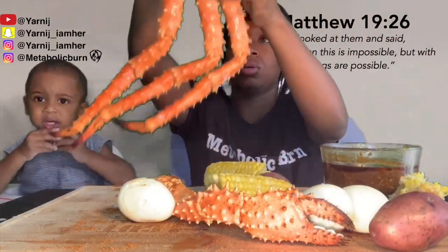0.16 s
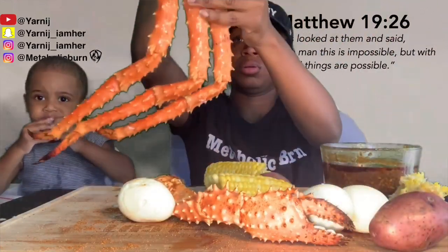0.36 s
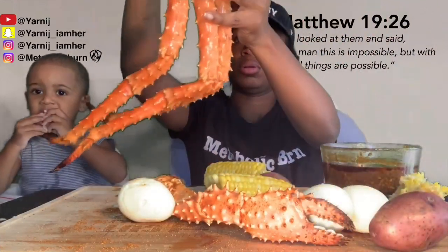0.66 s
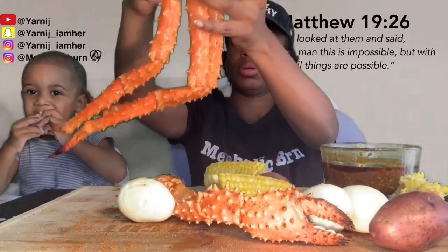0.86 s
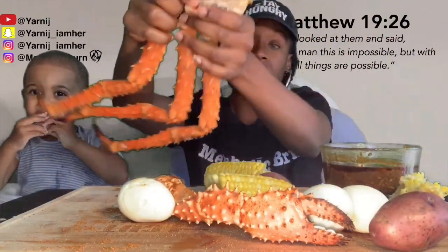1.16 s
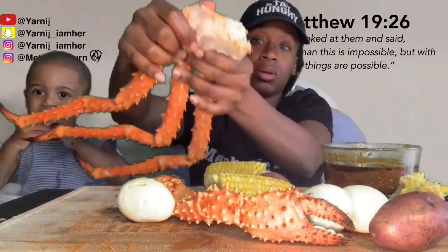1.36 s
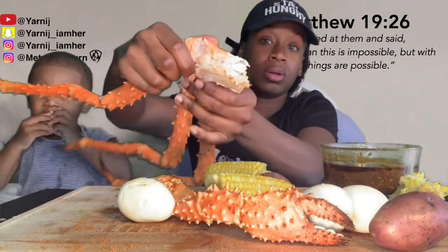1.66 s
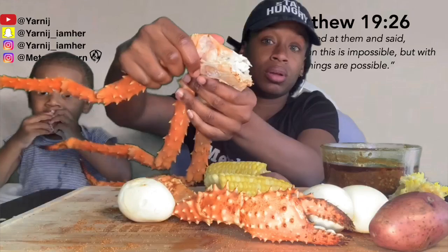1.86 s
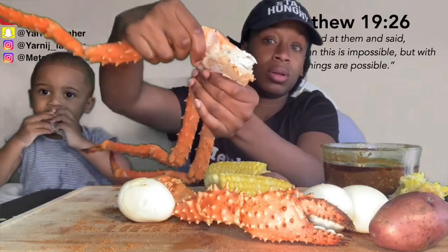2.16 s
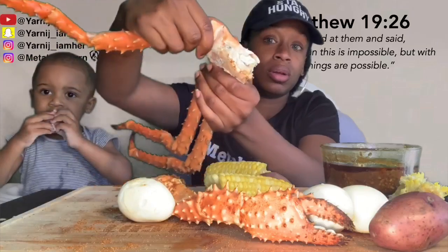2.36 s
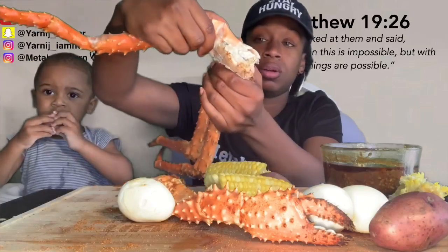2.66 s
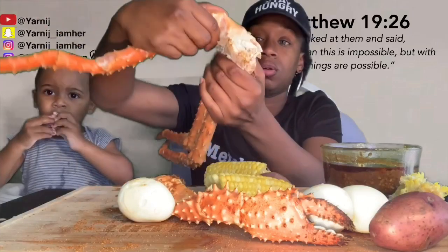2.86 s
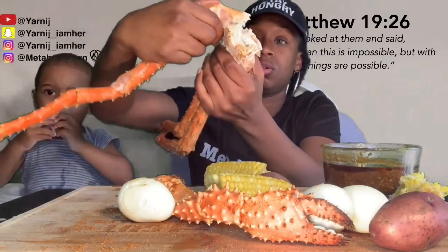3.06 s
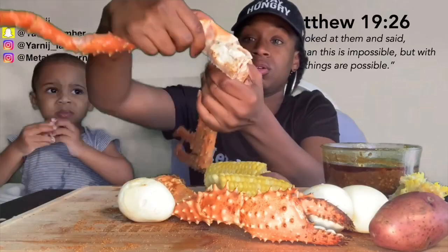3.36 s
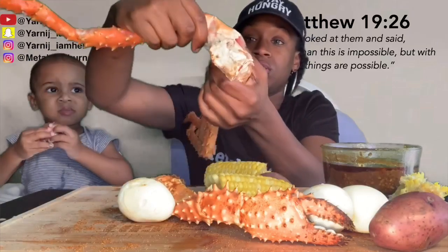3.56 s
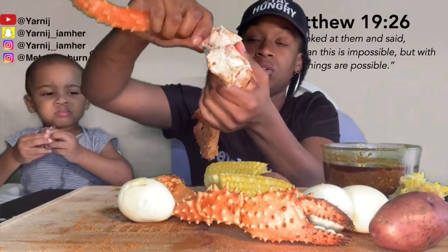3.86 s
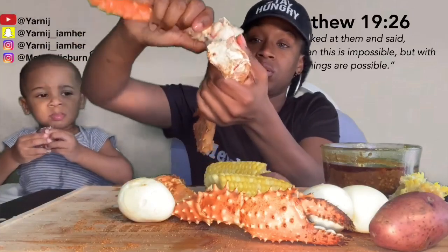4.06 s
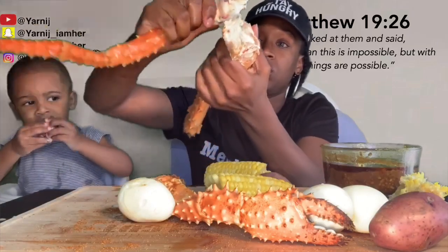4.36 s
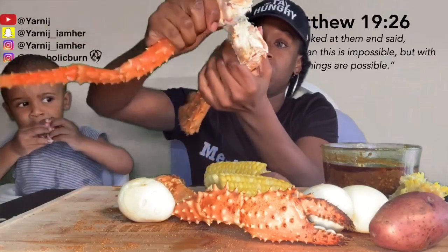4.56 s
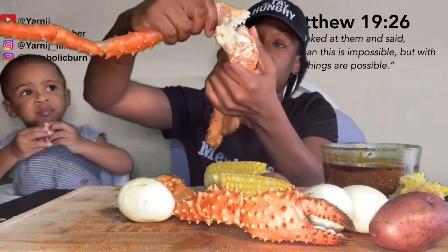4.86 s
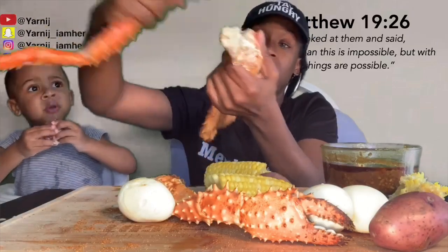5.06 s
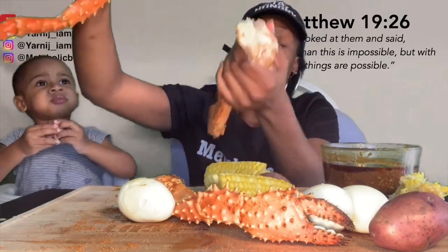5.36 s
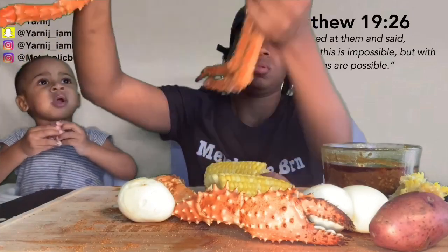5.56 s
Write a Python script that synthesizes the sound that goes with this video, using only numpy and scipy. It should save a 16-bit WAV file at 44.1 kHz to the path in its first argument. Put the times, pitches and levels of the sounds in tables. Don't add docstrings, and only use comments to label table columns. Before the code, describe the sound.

A hard, bare dining room with low building rumble, soft fan air and faint hiss. From 0 to 2.3 seconds cooked crab legs are only handled: faint spiny taps, light scrapes, and small dull crackles around 0.9 to 1.1. A steady low appliance hum rises at about 1.1 and drops away near 2.3; a soft low table thump falls at 1.6. From 2.35 small ticks gather, with a sharp crack at 2.5, into a dense, loud crunch of bright snaps, flying splinters and slight hollow knocks peaking at 2.7 to 2.9, with a last crack at 3.0. Light crackles at 3.3 precede one very loud, crisp snap at 3.55. Smaller cracks follow at 3.7 and 3.9, a strong, more hollow one at 4.05, then faint ticks around 4.4. A final sharp snap with a soft thump comes at 5.0, then near quiet and tiny taps around 5.4. Reflections are short and hard.

```python
import sys
import numpy as np
from scipy import signal
from scipy.fft import rfft, irfft
from scipy.io import wavfile
from scipy.ndimage import uniform_filter1d

SR = 44100
rng = np.random.default_rng(int(sys.argv[2]) if len(sys.argv) > 2 else 0)


def how_loud(loudness_db):
    steps = np.asarray(loudness_db, float) / 20
    return 10 ** steps


def wav_record(signal):
    frames = np.transpose(np.atleast_2d(signal))
    bounded = np.clip(frames, -1, 1)
    quanta = np.round(bounded * 32767).astype(np.int16)
    wavfile.write(sys.argv[1], SR, quanta)


N = 251655

# start_s, snap_db, crack_db, knock_db, crack_hz
LEG_BREAKS = [(0.0196, -51, -43.5, -64, 4200), (1.2223, -75, -57.5, -56.5, 2690),
              (2.3471, -30, -33.5, -63.5, 5040), (2.437, -32, -34, -75, 5000),
              (2.5086, -18.5, -25, -54, 5170), (2.5933, -33, -26, -39.5, 3940),
              (2.6676, -23, -35.5, -57, 4050), (2.7155, -11.5, -12.5, -39, 4090),
              (2.7215, -20, -30, -49, 4140), (2.7367, -17, -23.5, -45, 4650),
              (2.7737, -7.5, -16.5, -43.5, 5470), (3.312, -31, -35, -61, 3300),
              (3.4219, -40, -39.5, -44.5, 3220), (3.5518, -6.5, -16.5, -39.5, 3710),
              (3.8767, -43.5, -38, -50.5, 4100), (3.961, -37, -40, -59, 4670),
              (3.9881, -27.5, -35.5, -70, 5000), (4.0516, -13, -22.5, -28.5, 3500),
              (4.181, -61, -41.5, -47.5, 3200), (4.37, -43.5, -42, -58, 4000),
              (4.8522, -75, -58, -59.5, 3310), (4.8737, -25.5, -34.5, -60, 3620),
              (4.9858, -43, -40, -53, 3180), (4.9987, -14.5, -18.5, -31.5, 3600)]
# start_s, snap_db, crack_db, knock_db, crack_hz
KNUCKLE_BREAKS = [(0.9104, -49, -37, -45.5, 3260), (0.9777, -70, -46.5, -51.5, 3280),
                  (.9936, -55, -51, -51, 2480), (1.0575, -50.5, -46.5, -40.5, 2400),
                  (1.3469, -76, -66.5, -56.5, 3230), (2.7935, -36, -29, -33.5, 3000),
                  (2.8478, -19.5, -22, -37, 2800), (2.8529, -24, -30, -40, 3300),
                  (2.8643, -16, -32, -46, 4200), (2.871, -20, -16, -37, 4558),
                  (2.8867, -20, -44, -43, 4600), (2.9858, -15, -20.5, -36, 3520),
                  (3.72, -26.5, -36.5, -49.5, 3830), (4.0267, -61.5, -43.5, -55, 3760),
                  (4.0762, -30, -38, -33, 2050)]
# start_s, snap_db
SPLINTERS = [(2.448, -34.5), (2.4703, -30.5), (2.487, -36), (2.5804, -26.5), (2.5868, -21), (2.626, -31),
             (2.6352, -30), (2.644, -33), (2.7026, -31), (2.756, -31.5), (2.7605, -9), (2.805, -34),
             (2.8162, -25), (2.8567, -23.5), (3.0104, -28.5), (3.3225, -35), (3.33, -31), (3.338, -33),
             (3.882, -45), (3.904, -47), (3.9694, -36), (3.9931, -53.5), (4.3484, -57), (4.388, -44.5),
             (4.4048, -39.5), (5.0251, -30)]
# start_s, knock_db, crack_db
TAPS = [(0.0916, -53.5, -80), (0.1403, -64, -61.5), (.154, -66, -62), (0.1771, -52.5, -61.5),
        (.3863, -59, -56.5), (0.5402, -58, -62.5), (.5747, -68, -62), (0.6592, -62.5, -65),
        (1.0497, -71, -49), (1.112, -78, -78), (1.2528, -84, -67), (1.8436, -64, -65.5), (2.1528, -84, -73),
        (2.2858, -79.5, -61), (4.019, -56, -48), (4.66, -63, -76), (4.704, -67.5, -77.5),
        (4.8155, -83, -57), (5.4029, -60, -67), (5.45, -86, -72), (3.4024, -55.5, -54), (3.436, -62.5, -66),
        (0.876, -64, -72), (1.074, -59, -64)]
# start_s, length_s, level_db, centre_hz, width_octaves
SLIDES = [(0, 0.12, -75, 4260, 0.22), (0.641, 0.043, -79.5, 5000, 1.1), (0.844, 0.23, -75.5, 2940, 1),
          (1.285, 0.22, -71.5, 5150, 0.69), (1.599, 0.11, -78.5, 3230, 0.4), (2.26, 0.085, -77, 4830, 0.32),
          (2.368, 0.19, -61.5, 5250, 0.18), (3.312, 0.1, -56.5, 3520, 0.17),
          (3.528, 0.034, -56.5, 4400, 0.51), (3.982, .05, -61, 4540, 0.62),
          (4.487, 0.093, -71.5, 14800, 0.22), (4.613, 0.16, -81, 1794, 0.1),
          (5.182, 0.028, -75, 14100, 0.23), (5.441, 0.031, -76.5, 5600, 0.099)]
# start_s, level_db, pitch_hz, decay_ms
BUMPS = [
    (1.603, -51, 220, 69),
    (1.2, -67, 220, 11),
    (1.3, -74, 440, 12),
    (1.46, -57.5, 980, 3.3),
    (4.053, -55.5, 320, 8.7),
    (5.0, -53, 280, 27),
    (1.06, -52, 240, 21),
]
# delay_ms, level_db
ECHOES = [(4.7, -16), (6.8, -12.5), (10.0, -13.5), (13.0, -22), (23.0, -18), (25.0, -28.5)]
# centre_hz, t60_s, tail_db, early_scatter_db
ROOM = [(610, 0.3, -34, -31.5), (1410, 0.73, -37, -28), (1935, 0.54, -30.5, -28),
        (2800, 0.44, -32.5, -27.5), (5600, 0.49, -36, -35), (8700, 0.37, -33.5, -30.5),
        (15000, 0.21, -34, -36)]
# freq_hz, level_db
BEAM = [(5000, 0), (6500, -3), (7600, 1), (8900, 5), (10300, 3), (11800, 0), (13500, 1), (15500, 0)]
# time_s, level_db
AIR = [(0, 1), (.3, -0.5), (.75, 0.5), (1.0, 3), (1.6, 0), (2.1, -2), (2.5, 0.5), (3.1, -1), (4.5, -3.5),
       (5.05, -3), (5.35, -8.5), (5.71, -5)]
# freq_hz, density_db_per_hz
RUMBLE = [(12, -49), (20, -13), (53, 1.5), (72, 4), (92, -8.5), (124, -3), (189, -13), (248, -10),
          (403, -27), (600, -36), (780, -62), (1320, -120)]
FAN = [(450, -14), (650, -7.5), (850, -5.5), (1050, -10.5), (1350, -3), (1800, -12.5), (2100, -20),
       (3000, -47.5)]
HISS = [(300, 14.5), (1000, -4), (2000, -4.5), (4000, -4), (8000, -8.5), (15000, -9.5)]
# freq_hz, share_0_to_1, right_against_left_phase_rad
TREBLE = [(5000, 0, 4.6), (6500, .5, 4.4), (7400, .75, 3.9), (8100, .9, 3.5), (8600, .99, 3.2),
          (9400, .99, 3.05), (10000, .92, 2.6), (12000, .8, 1.2), (12800, .88, .6), (13400, .99, .1),
          (16000, .97, -.2)]

LEG_HZ, KNUCKLE_HZ, KNOCK_WANDER, KNOCK_DECAY_MS = 1290, 807, 0.028, 1.6
SNAP_HZ, SNAP_WANDER, SNAP_OCTAVES, CRACK_OCTAVES = 10200, 0.073, 0.47, 0.64
DISPERSION_MS = 1.0
TEAR_MS = 0.25
UNEVEN_DB = 1.6
SPLINTER_CRACK_DB, SPLINTER_KNOCK_DB, SPLINTER_HZ = -14.5, -35.5, 5000
TAP_SNAP_DB, TAP_HZ = -6.5, 3730
PORT_LAG_S = 4 / 44100
ECHO_LOW_HZ = 1203
ROOM_FILL_MS, SCATTER_MS = 28.5, 14.5
RUMBLE_DB, RUMBLE_FOLLOWS, FAN_DB, FAN_FOLLOWS, HISS_DB = -59, 1, -73, 1.7, -76
HUM_HZ, HUM_IDLE_DB, HUM_IDLE_WAVER_DB, HUM_LOAD_DB = 122.6, -72, 2.5, -55
HUM_ON_S, HUM_OFF_S, HUM_RISE_S, HUM_FALL_S = 1.14, 2.26, 0.05, 0.081


def colour(x, points):
    hz, db = np.transpose(points)
    bins = np.fft.rfftfreq(x.shape[-1], 1 / SR) + 1
    gain = how_loud(np.interp(np.log(bins), np.log(hz), db))
    return irfft(rfft(x) * gain, x.shape[-1])


def band(x, lo_hz, hi_hz, order=2):
    sos = signal.butter(order, [lo_hz, min(hi_hz, 20000)], "band", fs=SR, output="sos")
    return signal.sosfilt(sos, x)


def bell(hz, centre_hz, octaves):
    return np.exp(-0.5 * (np.log2(hz / centre_hz) / octaves) ** 2)


def level(x, db):
    return x * how_loud(db) / np.sqrt(np.mean(x ** 2))


def peak(x, db):
    return x * how_loud(db) / np.abs(x).max()


def walk(rate_hz):
    hold = int(SR / rate_hz)
    steps = np.repeat(rng.standard_normal(N // hold + 1), hold)
    return 2.2 * uniform_filter1d(uniform_filter1d(steps, hold), hold)[:N]


def pair(likeness):
    mid, side = rng.standard_normal((2, N))
    likeness = np.clip(likeness, 0, 1)
    return np.sqrt(1 + likeness) * mid + np.sqrt(1 - likeness) * side * np.array([[1], [-1]])


def background(rumble_db, hum_db, fan_db):
    rumble = level(colour(pair(0.66), RUMBLE), 0.44) * how_loud(rumble_db + 0.46 * walk(3.5))
    turn = 2 * np.pi * np.cumsum(HUM_HZ * (1 + 0.005 * walk(2.7))) / SR
    hum = np.sqrt(2) * np.sin(turn) + how_loud(-23.5) * np.sin(2 * turn) + how_loud(-32) * np.sin(3 * turn)
    hum = hum * how_loud(hum_db + 0.73 * walk(18)) * how_loud(np.array([[1.2], [-1.2]]))
    fan = level(colour(pair(0), FAN), 0) * how_loud(fan_db + 0.9 * walk(10))
    hiss = level(colour(pair(0), HISS), HISS_DB)
    return rumble + hum + fan + hiss


def slides():
    out = np.zeros(N)
    clicks = rng.standard_normal(N) * (rng.random(N) < 0.15)
    clicks = clicks * how_loud(2.8 * rng.exponential(size=N) + 2.5 * walk(60))
    for start_s, length_s, db, centre_hz, octaves in SLIDES:
        start, count = int(max(start_s, 0) * SR), 2 * int(length_s * SR / 2)
        hz = np.fft.rfftfreq(count, 1 / SR) + 1
        scrape = irfft(rfft(clicks[start:start + count]) * bell(hz, centre_hz, octaves))
        swell = np.sin(np.pi * (np.arange(count) / count) ** 0.7)
        out[start:start + count] += level(scrape, db) * swell
    return out


def break_events():
    events = [(*row, LEG_HZ) for row in LEG_BREAKS]
    events += [(*row, KNUCKLE_HZ) for row in KNUCKLE_BREAKS]
    for s, snap_db in SPLINTERS:
        events.append((s, snap_db, snap_db + SPLINTER_CRACK_DB, snap_db + SPLINTER_KNOCK_DB,
                       SPLINTER_HZ, LEG_HZ))
    for s, knock_db, crack_db in TAPS:
        events.append((s, crack_db + TAP_SNAP_DB, crack_db, knock_db, TAP_HZ, LEG_HZ))
    return events


def fractures():
    size = 1024
    out, t = np.zeros(N + size), np.arange(size) / SR
    hz = np.fft.rfftfreq(size, 1 / SR) + 1
    events = break_events()
    chance = rng.standard_normal((len(events), 3, size))
    dispersion = np.exp(-2j * np.pi * (2 * DISPERSION_MS / 1000 * np.sqrt(2000 * hz) + 64 * hz / SR))
    lead = int(60 + DISPERSION_MS * 0.55 * SR / 1000)
    for event, (colour_noise, ring_noise, tear_noise) in zip(events, chance):
        start_s, snap_db, crack_db, knock_db, crack_hz, knock_hz = event
        snap_hz = SNAP_HZ * np.exp(SNAP_WANDER * colour_noise[-1])
        knock_hz = knock_hz * np.exp(KNOCK_WANDER * colour_noise[-2])
        uneven = how_loud(UNEVEN_DB * 5 * uniform_filter1d(colour_noise[:len(hz)], size=25))
        lag_s = TEAR_MS / 1000 * 5 * uniform_filter1d(tear_noise[:len(hz)], size=25)
        tear = np.exp(-2j * np.pi * np.cumsum(lag_s) * SR / size)
        burst = uneven * dispersion * tear
        snap = irfft(burst * (bell(hz, snap_hz, SNAP_OCTAVES) + 0.45) / (1 + (7000 / hz) ** 6))
        crack = irfft(burst * bell(hz, crack_hz, CRACK_OCTAVES))
        ring = np.sin(2 * np.pi * knock_hz * t) + 1.2 * level(band(ring_noise, 550, 2000), 0)
        knock = np.roll(band(ring * np.exp(-t * 1000 / KNOCK_DECAY_MS), 560, 2500), lead)
        mix = peak(snap, snap_db + 0.5) + peak(crack, crack_db + 5.0) + peak(knock, knock_db + 4.0)
        start = int(start_s * SR) - lead
        out[start:start + size] += mix
    return out[:N]


def room():
    t = np.arange(SR // 2) / SR
    response = np.zeros((2, len(t)))
    response[0, int(round(PORT_LAG_S * SR))] = 1
    response[1, 0] = 1
    response = colour(response, BEAM)
    tap = np.arange(32)
    for (delay_ms, db), smear in zip(ECHOES, rng.standard_normal((len(ECHOES), 2, 32))):
        start = int(delay_ms * SR / 1000)
        echo = level((smear + 4.0 * (tap == 0)) * np.exp(-tap / 6), db - 15)
        response[:, start:start + 32] += band(echo, ECHO_LOW_HZ, 20000, order=1)
    hz, *columns = np.transpose(ROOM)
    for centre_hz in 400 * 2 ** np.arange(0, 5.6, 0.5):
        t60_s, tail_db, early_db = (np.interp(np.log(centre_hz), np.log(hz), c) for c in columns)
        tail = how_loud(tail_db - 60 * t / t60_s) * (1 - np.exp(-(t * 1000 / ROOM_FILL_MS) ** 2))
        early = how_loud(early_db) * np.exp(-(t * 1000 / SCATTER_MS) ** 2) * np.minimum(t / 0.0015, 1)
        noise = band(rng.standard_normal((2, len(t))), centre_hz / 2 ** 0.25, centre_hz * 2 ** 0.25)
        response += (tail + early) * noise
    return np.roll(response, 32, axis=1)[:, :-400]


def bumps():
    out = np.zeros(N)
    for start_s, db, hz, decay_ms in BUMPS:
        t = np.maximum(np.arange(N) / SR - start_s, 0)
        fade = np.exp(-t * 1000 / decay_ms)
        tone = np.sin(2 * np.pi * np.cumsum(hz * (0.7 + 0.34 * fade)) / SR)
        rough = level(band(rng.standard_normal(N), 0.54 * hz, 1.29 * hz), -1.1)
        out += how_loud(db) * (tone + rough) * fade * np.minimum(t / 0.0046, 1)
    return out


def scene():
    t = np.arange(N) / SR
    air_db = np.interp(t, *np.transpose(AIR))
    load = np.minimum((t - HUM_ON_S) / HUM_RISE_S, (HUM_OFF_S - t) / HUM_FALL_S)
    load = np.clip(load + 0.5, 0, 1)
    idle_db = HUM_IDLE_DB + air_db + HUM_IDLE_WAVER_DB * walk(9.5)
    hum_db = load * HUM_LOAD_DB + (1 - load) * idle_db
    near = fractures() + bumps() + slides()
    near = signal.fftconvolve(near[None], room(), axes=1)[:, 32:N + 32]
    near = near * how_loud(np.array([[-0.9], [0.9]]))
    return near + background(RUMBLE_DB + RUMBLE_FOLLOWS * air_db, hum_db, FAN_DB + FAN_FOLLOWS * air_db)


def roll_off(x):
    return signal.sosfilt(signal.butter(12, 16960, fs=SR, output="sos"), x)


def record(dry):
    hz = np.fft.rfftfreq(N, 1 / SR)
    left, right = rfft(dry)
    at_hz, share, phase_rad = np.transpose(TREBLE)
    share, phase_rad = np.interp(hz, at_hz, share), np.interp(hz, at_hz, phase_rad)
    right = share * left * np.exp(1j * phase_rad) + np.sqrt(1 - share ** 2) * right
    limit = 1 / (1 + (hz / 15850) ** 150) + how_loud(-32) / (1 + (hz / 16700) ** 200)
    mix = irfft(np.array([left, right]) * limit, N)
    return roll_off(mix)


dry = scene()
out = record(dry)
wav_record(out)
```